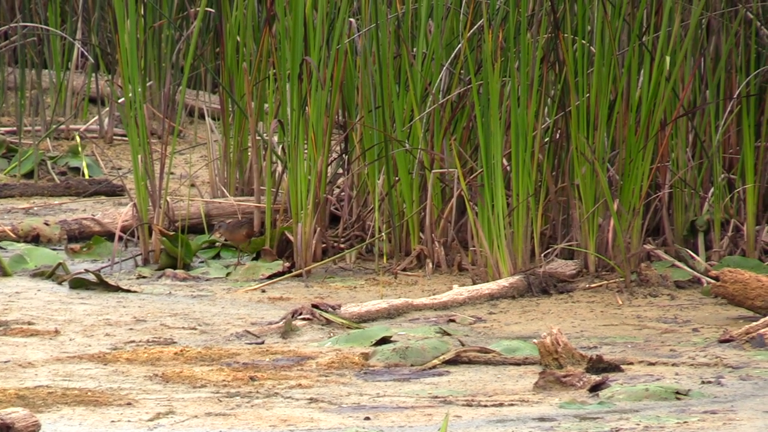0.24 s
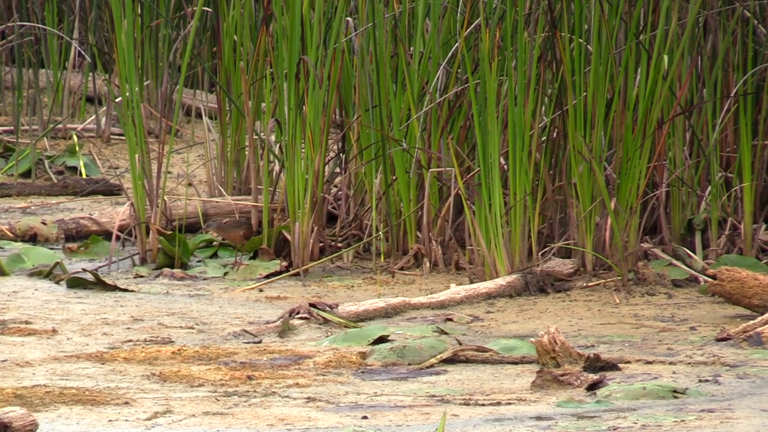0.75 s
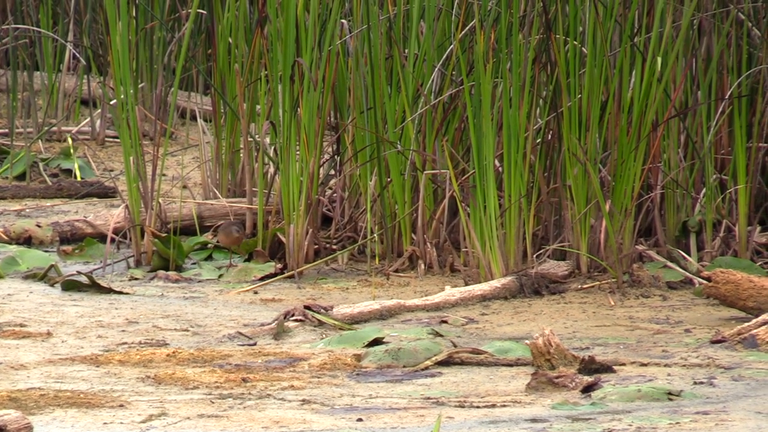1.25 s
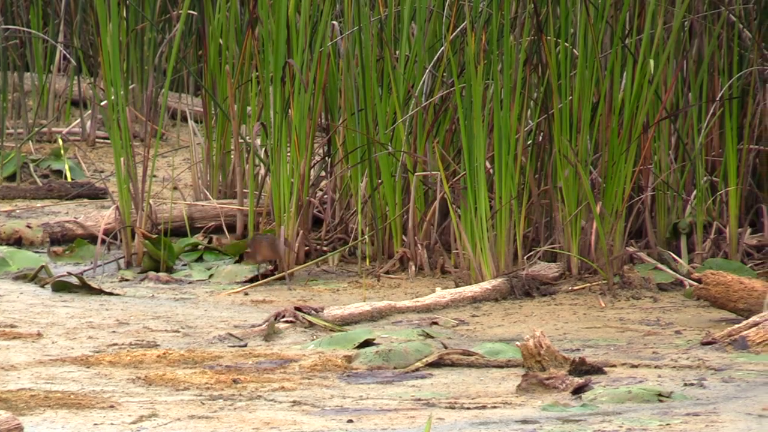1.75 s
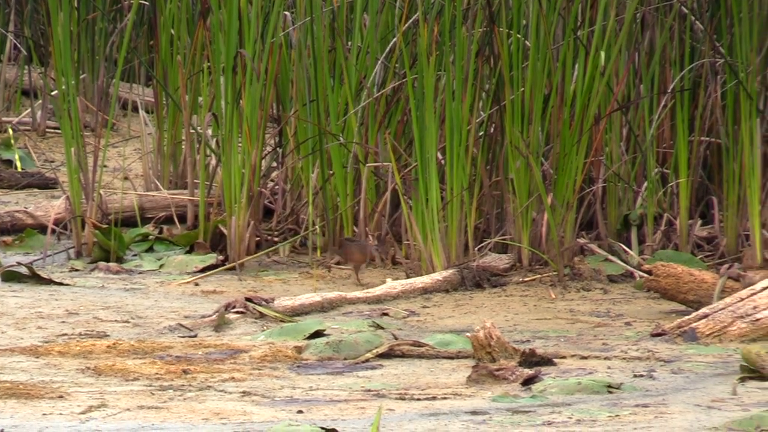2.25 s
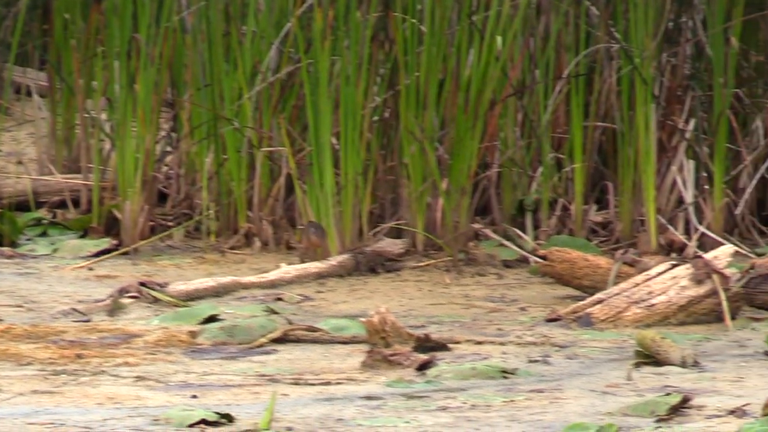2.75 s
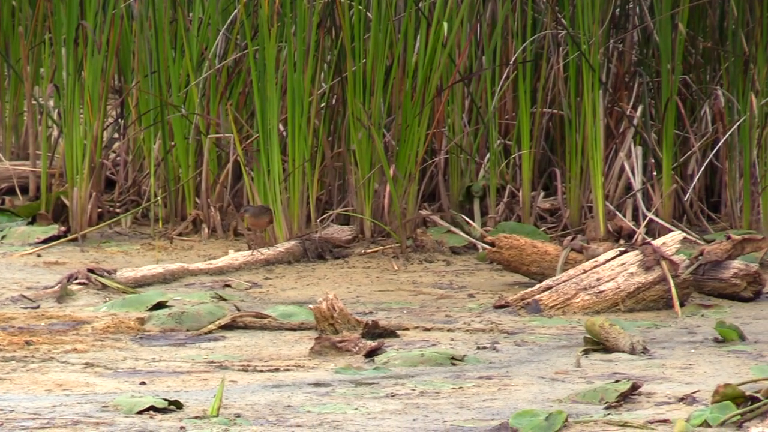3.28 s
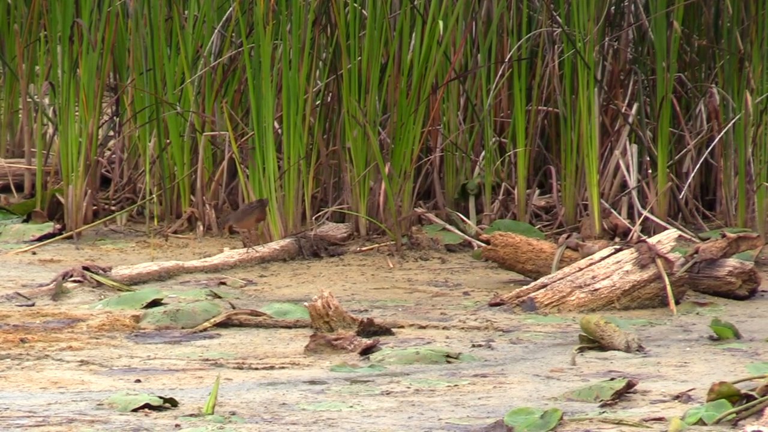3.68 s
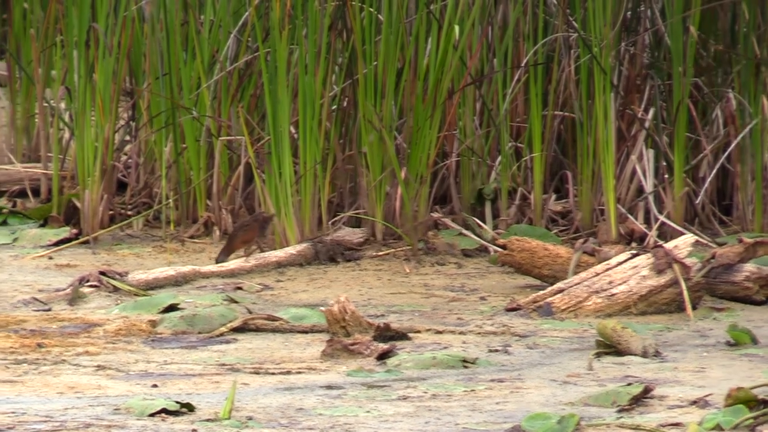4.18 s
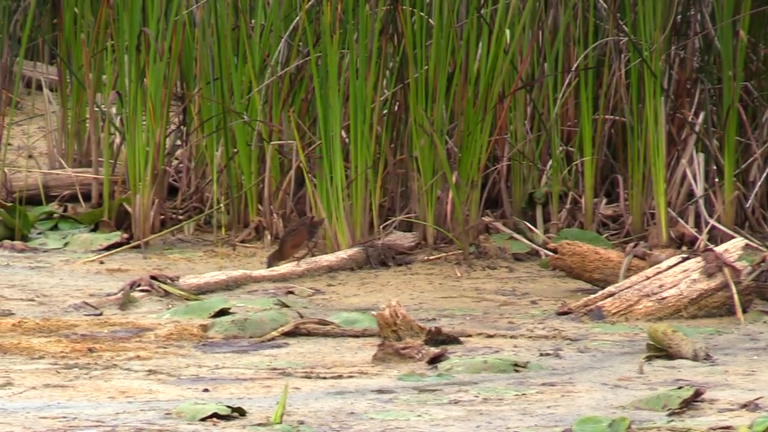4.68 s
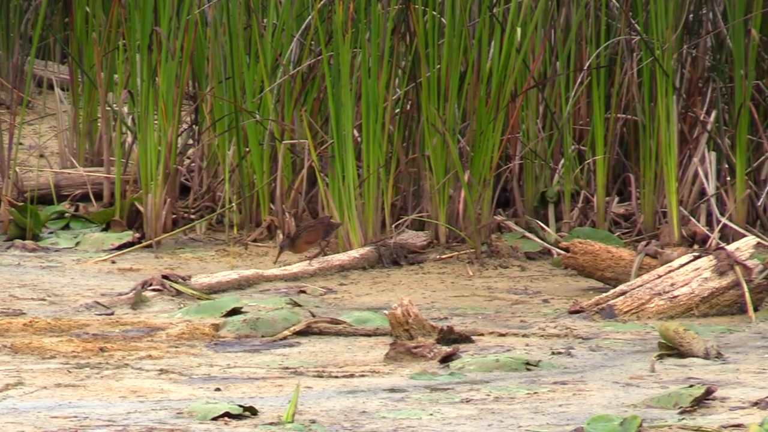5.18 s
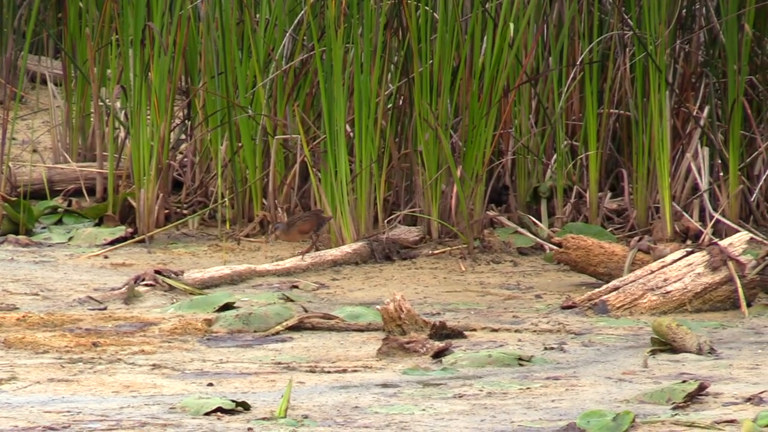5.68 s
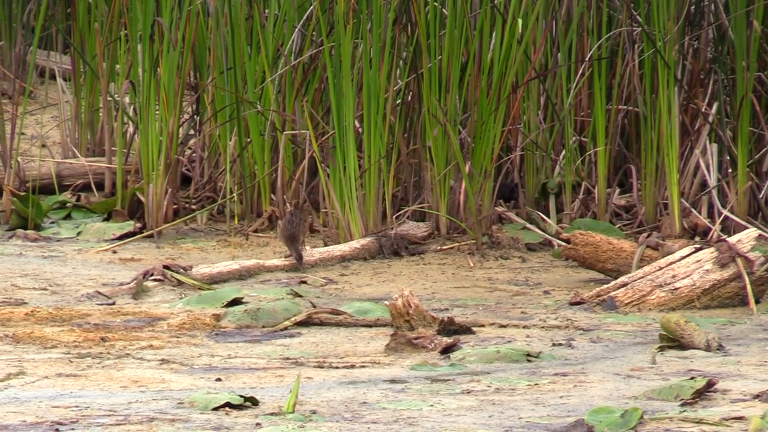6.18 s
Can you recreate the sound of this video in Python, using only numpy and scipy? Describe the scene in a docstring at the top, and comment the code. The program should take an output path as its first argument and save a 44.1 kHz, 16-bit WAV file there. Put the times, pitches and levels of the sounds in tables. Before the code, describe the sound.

A warm, quiet marsh heard outdoors, nearly mono. Throughout, close ground crickets make a bright tinkling near 8 kHz, each pulsing about fifteen times a second and overlapping into a shimmer; softer tree crickets hold a smooth fast trill near 5.5 kHz, with a blurred crowd of far insects behind. Another cricket gives a tiny, very high chirp of rapid strokes about every third of a second. Faint bird whistles slide between 1.0 and 1.6 s, with a blip near 1.9. From 2.4 s small distant birds twitter in quick darting notes and short buzzes, busiest around 2.6 and 3.9 to 4.5 s, ending about 4.9. Dry stem ticks fall at 0.1, in a little cluster at 1.0, then 1.5, 2.0, 2.4, 4.1, 5.0 and 5.7, the clearest at 6.05. Very low far traffic and faint hiss sit underneath; the insects continue to the end at 6.4 s.

```python
"""Warm day at the marsh

Ground crickets tinkle near 8 kHz close to the microphone, tree crickets trill near 5.5 kHz and one cricket
chirps at 9 kHz: all are tones shaped by wing strokes, over the coloured noise of far crowds.
Small birds farther off twitter in gliding whistles and shaken buzzes; stems tick in the mud as struck
resonances. Far traffic and microphone hiss are patchy noise. The sound is nearly mono."""
import sys
import numpy as np
from scipy import signal
from scipy.fft import rfft, irfft, next_fast_len
from scipy.io import wavfile
from scipy.ndimage import uniform_filter1d, map_coordinates

SR = 44100
rng = np.random.default_rng(int(sys.argv[2]) if len(sys.argv) > 2 else 0)


def store_wav(level_fs):
    """Save 16-bit WAV to argv[1]."""
    pcm = np.round(np.clip(np.atleast_2d(level_fs), -1, 1) * 32767)
    wavfile.write(sys.argv[1], SR, pcm.T.astype(np.int16))


N = 283563
T = np.arange(N) / SR  # seconds

# Far traffic through time. Each row: time in seconds, rumble level in dB, road drone level in dB.
TRAFFIC_LEVELS = [(0, -58, -51.5), (.6, -58, -52), (1.2, -55, -52.5), (1.8, -58, -53), (2.4, -64.5, -53),
                  (3.7, -59.5, -54), (4.5, -60, -55), (5.3, -65.5, -53.5), (5.8, -59, -53.5),
                  (6.43, -59.5, -55)]
# Colour of the far rumble. Each row: frequency in Hz, relative level in dB per Hz.
RUMBLE_COLOUR = [(12, -33), (22, -4), (33, -9), (55, -5.5), (75, 2), (129, -11), (170, -14.5), (220, -60)]
# Colour of the road drone. Each row: frequency in Hz, relative level in dB per Hz.
ROAD_COLOUR = [(76, -36), (130, -14), (193, 0), (257, -5.5), (381, -8.5), (607, -4.5), (861, -2.5),
               (4200, -30.5), (5460, -56)]
# Colour of the microphone hiss. Each row: frequency in Hz, relative level in dB per Hz.
HISS_COLOUR = [(1500, -20), (2600, -2.5), (4000, 0.5), (9500, -6.5), (10800, 2.5), (12000, -3), (15600, 1)]
# Level of a faint left-right difference noise. Each row: frequency in Hz, gain in dB.
DIFFERENCE_GAIN = [(60, -47), (380, -16.5), (1000, -38.5), (2400, -7.5), (4400, -32), (15000, -58)]
# Ticks of stems and mud. Each row: start in seconds, peak level in dB, brightness in dB per octave,
# length in seconds (the crackle falls 10 dB in it).
STEM_TICKS = [(.088, -36.5, -2, 0.03), (1.008, -40, -18, 0.011), (1.036, -37.5, -13, 0.018),
              (1.092, -37, -13, 0.021), (1.378, -46, -9, .02), (1.512, -34.5, -7, .018),
              (1.521, -40, 15, .012), (1.96, -37.5, -7, 0.045), (2.017, -37, -8, .012),
              (2.344, -37.5, -9, 0.027), (2.4, -40.5, 1, 0.02), (4.056, -35.5, -0.5, 0.029),
              (4.974, -42.5, -18, .015), (5.009, -43.5, -12, 0.018), (5.106, -42, -20, .02),
              (5.727, -35.5, -3, .012), (5.736, -42, 13, .01), (5.779, -40, -3, 0.017),
              (6.056, -31, -4.5, 0.023), (6.12, -38.5, -17, .03), (6.313, -44.5, -17, 0.02)]
# Resonances of a stem. Each row: frequency in Hz, width in Hz, level in dB.
STEM_MODES = [(1110, 270, 0), (1740, 290, -0.5), (2330, 440, 3), (3800, 1100, -1.5)]
# Whistled bird notes that glide to a turning pitch and away. Each row: start, turn and end in seconds,
# first, turning and last pitch in Hz, level at the highest pitch in dB.
BIRD_NOTES = [(.518, .535, .551, 2980, 2950, 2980, -68), (0.994, 1.01, 1.08, 3780, 4030, 4170, -59),
              (1.089, 1.118, 1.132, 4150, 4220, 4330, -54), (1.132, 1.145, 1.184, 4250, 4110, 4200, -63),
              (1.18, 1.2, 1.21, 4170, 4390, 3950, -53.5), (1.246, 1.255, 1.312, 4300, 4430, 4380, -50),
              (1.312, 1.34, 1.357, 4360, 4470, 4360, -53), (1.357, 1.384, 1.392, 4360, 4384, 4100, -49),
              (1.393, 1.428, 1.465, 2870, 2760, 2860, -61), (1.462, 1.476, 1.483, 4180, 4120, 4500, -56),
              (1.483, 1.492, 1.506, 4500, 4570, 4500, -52), (1.475, 1.52, 1.555, 6030, 6400, 6400, -56),
              (1.53, 1.55, 1.565, 4600, 4400, 4150, -56), (1.57, 1.573, 1.579, 4000, 3950, 3850, -55),
              (1.879, 1.888, 1.894, 4800, 4100, 4450, -54), (2.437, 2.445, 2.455, 3580, 2880, 3310, -54),
              (2.456, 2.465, 2.477, 3310, 3660, 2980, -51), (2.498, 2.506, 2.524, 5240, 4950, 3650, -42.5),
              (2.523, 2.536, 2.546, 3650, 3350, 3540, -52), (2.546, 2.553, 2.558, 3500, 3050, 4250, -49),
              (2.57, 2.581, 2.593, 4150, 4300, 3500, -50), (2.593, 2.6, 2.607, 3500, 3150, 2850, -50),
              (2.597, 2.605, 2.617, 4260, 3760, 3400, -48), (2.62, 2.629, 2.655, 3850, 4380, 4150, -52),
              (2.66, 2.67, 2.676, 3860, 3100, 2950, -47), (2.679, 2.684, 2.69, 3050, 3050, 3200, -47),
              (2.672, 2.684, 2.697, 3950, 4170, 4400, -42.5), (2.69, 2.697, 2.712, 3200, 3620, 2890, -47),
              (2.698, 2.705, 2.712, 4420, 4280, 3900, -42), (2.712, 2.717, 2.723, 3300, 4290, 3390, -47),
              (2.723, 2.727, 2.733, 3400, 4220, 3600, -44), (2.733, 2.738, 2.746, 3600, 4050, 3350, -46),
              (2.746, 2.756, 2.761, 3370, 3020, 2150, -56), (2.95, 2.954, 2.957, 3050, 3050, 3060, -57),
              (2.957, 2.958, 2.961, 4050, 4100, 4150, -50), (2.962, 2.966, 2.97, 3400, 4300, 3050, -47),
              (2.977, 2.984, 2.989, 5300, 3590, 4300, -42), (2.989, 2.995, 3.007, 4700, 4800, 5040, -39.5),
              (3.161, 3.165, 3.17, 6330, 5200, 4320, -41), (3.162, 3.174, 3.182, 3450, 3180, 3350, -55.5),
              (3.182, 3.187, 3.198, 3350, 3700, 3250, -57), (3.2, 3.212, 3.214, 5000, 3250, 3100, -43.5),
              (3.259, 3.259, 3.27, 3000, 3250, 4800, -46), (3.27, 3.282, 3.284, 4900, 3250, 3100, -47),
              (3.283, 3.302, 3.313, 3070, 3200, 3150, -52), (3.419, 3.424, 3.428, 4150, 4150, 4400, -52),
              (3.445, 3.449, 3.45, 4460, 4250, 4100, -50), (3.565, 3.574, 3.583, 5000, 4820, 4050, -43.5),
              (3.598, 3.605, 3.62, 4000, 4850, 4550, -46), (3.623, 3.637, 3.65, 4600, 3650, 5000, -47.5),
              (3.657, 3.669, 3.688, 5040, 3420, 3390, -48.5), (3.719, 3.734, 3.756, 4900, 3420, 4150, -47),
              (3.703, 3.735, 3.742, 3900, 2930, 3050, -57), (3.742, 3.76, 3.771, 3030, 3250, 2150, -51),
              (3.765, 3.769, 3.773, 4700, 4200, 3100, -50), (3.861, 3.865, 3.869, 3950, 3650, 3130, -43),
              (3.869, 3.87, 3.882, 3150, 3230, 5200, -44), (3.886, 3.891, 3.896, 4200, 4100, 3000, -40.5),
              (3.847, 3.852, 3.858, 2650, 2680, 2780, -62), (3.903, 3.911, 3.921, 5300, 2950, 3150, -45),
              (3.977, 3.994, 4.0, 2690, 2760, 2850, -59), (3.988, 3.994, 4.001, 4440, 3060, 3060, -43),
              (4.001, 4.002, 4.011, 3060, 3040, 4700, -42), (4.022, 4.042, 4.062, 4150, 4120, 4000, -54),
              (4.072, 4.11, 4.145, 2710, 2610, 2760, -63), (4.11, 4.117, 4.124, 5000, 3500, 3050, -47),
              (4.122, 4.129, 4.134, 4500, 3450, 2700, -48), (4.174, 4.198, 4.232, 4550, 4360, 4435, -41),
              (4.235, 4.268, 4.28, 5450, 5150, 5400, -44), (4.279, 4.289, 4.335, 5400, 5440, 5250, -42),
              (4.336, 4.359, 4.395, 5250, 5300, 5580, -45.5), (4.239, 4.28, 4.318, 2660, 2730, 2670, -59.5),
              (4.24, 4.252, 4.259, 4300, 3450, 3700, -53), (4.259, 4.272, 4.285, 3700, 3070, 4400, -48),
              (4.285, 4.297, 4.305, 4320, 3700, 4700, -45), (4.32, 4.335, 4.344, 4920, 4040, 3450, -40),
              (4.367, 4.372, 4.376, 4460, 3500, 2760, -48), (4.368, 4.38, 4.395, 2730, 2760, 2820, -60),
              (4.387, 4.397, 4.43, 6100, 4150, 4450, -44), (4.404, 4.412, 4.416, 4600, 5100, 5900, -45),
              (4.471, 4.48, 4.484, 5280, 4150, 3300, -39), (4.493, 4.501, 4.514, 4300, 3470, 3400, -45),
              (4.513, 4.528, 4.537, 3410, 3700, 2600, -51), (4.676, 4.682, 4.696, 3900, 4150, 3600, -50),
              (4.696, 4.702, 4.711, 3600, 5000, 3600, -44), (4.71, 4.719, 4.725, 3600, 3600, 4300, -51),
              (4.884, 4.886, 4.911, 6350, 6230, 5300, -46)]
# Buzzy bird notes. Each row: start in seconds, length in seconds, first pitch in Hz, last pitch in Hz,
# pitch swing in Hz, level in dB.
BIRD_BUZZES = [(2.653, 0.024, 4270, 3730, 603, -45), (2.71, .04, 4000, 3700, 601, -48.5),
               (3.215, 0.035, 3340, 3350, 280, -49.5), (3.299, 0.13, 4010, 4690, 557, -48),
               (3.298, 0.073, 3190, 3500, 350, -56.5), (3.913, .024, 4200, 4150, 300, -52),
               (4.484, .018, 4800, 4000, 405, -45), (4.724, .033, 4100, 4190, 300, -55)]
# Chirps of the high cricket. Each entry: middle of the first full stroke in seconds.
CHIRP_TIMES = [.108, .441, .772, 1.12, 1.426, 1.877, 2.202, 2.587, 2.968, 3.355, 3.713, 4.089, 4.437, 4.777,
               5.129, 5.441, 5.787, 6.13, 6.417]
# Tree crickets that stand out of the trill. Each row: beat at the start in strokes, pace in strokes a
# second, change of pace in strokes a second per second, pitch in Hz, fall in Hz, stroke length in
# seconds, level in dB.
TREE_SINGERS = [(-.1, 75.74, .14, 5750, 500, 0.0097, -54.5), (-0.306, 70.02, -.06, 5500, 500, .01, -56),
                (.32, 81.37, -.02, 5750, 500, .008, -55.5), (-.22, 72.5, -.08, 5300, 490, .009, -56)]
# Colour of the far tree crickets. Each row: frequency in Hz, relative level in dB per Hz.
FAR_TREE_COLOUR = [(2470, -54), (4400, -19.5), (4840, -4.5), (5600, 4.5), (5930, -1.5), (6190, -14),
                   (6500, -22), (8450, -49)]
# Ground crickets near the microphone. Each row: beat at the start in strokes, pace at the start in
# strokes a second, change of pace in strokes a second per second, pitch in Hz, fall in Hz, stroke
# length in seconds, level in dB.
NEAR_SINGERS = [(-.165, 15.898, .0196, 7720, 900, .026, -43), (.03, 15.86, -.0112, 8360, 450, .022, -43),
                (-.38, 14.54, 0, 8240, 350, .02, -48), (-0.079, 14.331, -.0032, 8400, 380, .017, -50),
                (0.492, 15.862, -.012, 8720, 200, .015, -60), (.42, 14.92, 0, 8150, 350, .02, -50.5)]
# Colour of the blurred far ground crickets. Each row: frequency in Hz, relative level in dB per Hz.
FAR_GROUND_COLOUR = [(6000, -51), (6450, -19), (6900, -9.5), (7300, -2), (7650, 1.5), (8300, -5),
                     (8750, -7), (9000, -22), (9350, -48)]

TOP_HZ = 15750  # band limit of the recorder
JOIN = 66  # samples of fade on each side of a bird note's edge
WAVER_HZ = 22  # unsteadiness of a held bird pitch
SOFTER_DB_PER_KHZ, ROUND = 6, 1.393  # a note softens as its pitch drops; how round it bends into the turn


def amp(db):
    """Amplitude factor of a level in dB."""
    return 10 ** (np.asarray(db) / 20)


def unit(x):
    """x scaled to rms 1."""
    return x / np.sqrt(np.mean(x ** 2) + 1e-20)


def along(points, hz):
    """(Hz, value) points read on a log frequency axis."""
    f, value = np.transpose(points)
    return np.interp(np.log(hz + 1), np.log(f + 1), value)


def wobble(rate):
    """A smooth random curve, rate knots a second."""
    knots = rng.standard_normal(int(N * rate / SR) + 4)
    return map_coordinates(knots, [T * rate])


def filtered(x, response):
    """x times a complex response of frequency."""
    m = next_fast_len(N + SR // 2)
    return irfft(rfft(x, m) * response(np.fft.rfftfreq(m, 1 / SR)), m)[..., :N]


def rush(spectrum, patchy_db):
    """Coloured noise of rms 1 with patches of random gain in time and frequency."""
    z = signal.stft(rng.standard_normal(N), nperseg=256)[2]
    field = uniform_filter1d(rng.standard_normal(z.shape), 3, 0)
    field = uniform_filter1d(field, 8, 1)
    noise = signal.istft(z * amp(patchy_db * unit(field)), nperseg=256)[1][:N]
    return unit(filtered(noise, lambda hz: amp(along(spectrum, hz))))


def reeds(x, wet_db, t60):
    """Sound scattered by the stems follows the direct sound as a decaying noise tail."""
    t = np.arange(SR // 4) / SR
    tail = rng.standard_normal(len(t)) * amp(-60 * t / t60)
    return x + amp(wet_db) * signal.fftconvolve(x, tail / np.linalg.norm(tail))[:N]


def strokes(beat, rate, hz, fall_hz, length, scatter_db, lower_db=-7):
    """One tone per wing stroke on whole beats: pitch arches up, then slides and fades as the scraper slows."""
    from_centre = (beat + .5) % 1 - .5
    u = np.clip(from_centre / (rate * length) + .45, 0, 1)  # progress through the stroke
    number = np.round(beat - np.floor(beat.min())).astype(int)
    size, detune = rng.standard_normal((number.max() + 1, 2)).T
    rise = np.clip(1 - u / .3, 0, 1)
    slide = np.clip((u - .48) / .52, 0, 1)
    pitch = hz + 30 * detune[number] - 250 * rise ** 2 - fall_hz * slide ** 1.4
    shape = np.clip(np.minimum(u / 0.39, (1 - u) / 0.067), 0, 1) * amp(-13 * fall_hz / 1000 * slide)
    phase = 2 * np.pi * np.cumsum(pitch) / SR
    # the other wing rings a little lower
    wings = np.sin(phase) + amp(lower_db) * np.sin(0.966 * phase + 3 * detune[number])
    level = amp(scatter_db * size[number] + 1.87 * wobble(250))
    return unit(level * shape * wings)


def background():
    """Far traffic rumbles and drones over the hiss of the microphone."""
    s, rumble_db, road_db = np.transpose(TRAFFIC_LEVELS)
    rumble_level = amp(np.interp(T, s, rumble_db) + 1.7 * wobble(3.44))
    rumble = rumble_level * rush(RUMBLE_COLOUR, patchy_db=.5)
    road = amp(np.interp(T, s, road_db)) * rush(ROAD_COLOUR, patchy_db=1.0)
    return rumble + road + amp(-56.5) * rush(HISS_COLOUR, patchy_db=2.0)


def ticks():
    """A snap and a lumpy crackle ring the stem; brighter ticks weight the upper modes."""
    out = np.zeros(N + SR)
    t = np.arange(SR // 8) / SR
    f = np.fft.rfftfreq(len(t), 1 / SR)
    for s, db, bright_db, length in STEM_TICKS:
        lumps = amp(3.4 * np.repeat(rng.standard_normal(64), len(t) // 64 + 1)[:len(t)])
        snap = amp(-8 - 26 * t / 0.0063)
        crackle = lumps * amp(-15 - 10 * t / length)
        force = rng.standard_normal(len(t)) * (snap + crackle) + 1.55 * (t == 0)
        body = 0
        for k, (centre, width, level) in enumerate(STEM_MODES):
            mode_db = level + rng.normal(0, 1.4) + bright_db * max(0, np.log2(centre / 1650))
            resonance = 1j * f * width / (centre * centre - f * f + 1j * f * width)
            body = body + (-1) ** k * amp(mode_db) * resonance
        soft = (1 + 1j * f / (4600 * 2 ** (bright_db / 14))) ** -2  # a dull blow lasts longer
        tick = irfft(rfft(force) * soft * body, len(t))
        out[round(s * SR):][:len(t)] += amp(db) * tick / np.abs(tick).max()
    return out[:N]


def whistles():
    """Tones with a weak octave bend through one turn and waver; one begun where another ends continues it."""
    out, waver = np.zeros(N), WAVER_HZ * wobble(80)
    carried = {}  # phase left by a note, by its end time to a hundredth of a second
    for start, turn, end, first_hz, turn_hz, last_hz, db in BIRD_NOTES:
        cut = slice(round(start * SR) - JOIN, round(end * SR) + JOIN)
        t = T[cut]
        edge = np.clip(np.minimum(t - t[0], t[-1] - t) * SR / (2 * JOIN), 0, 1)
        away = np.interp(t, [start, turn, end], [1, 0, 1]) ** ROUND
        outer_hz = np.where(t < turn, first_hz, last_hz)
        hz = uniform_filter1d(turn_hz + (outer_hz - turn_hz) * away, size=60)
        phase = 2 * np.pi * np.cumsum(hz + waver[cut]) / SR
        phase += carried.get(round(start, 2), 0) - phase[JOIN]
        carried[round(end, 2)] = phase[-JOIN]
        drop_khz = (hz.max() - hz) / 1000
        tone = np.sin(phase) + amp(-23) * np.sin(2 * phase)
        out[cut] += np.sqrt(2) * amp(db - SOFTER_DB_PER_KHZ * drop_khz) * edge * tone
    return out


def buzzes():
    """Tones shaken in pitch around 185 times a second, louder on the upstroke."""
    out = np.zeros(N)
    for s, length, first_hz, last_hz, swing_hz, db in BIRD_BUZZES:
        u = np.clip((T - s) / length, 0, 1)
        cycle = 2 * np.pi * np.cumsum(185 + 30 * wobble(60)) / SR
        shake = np.sin(cycle) + .7 * wobble(500)
        upstroke = .72 + .28 * np.cos(cycle)
        pitch = first_hz + (last_hz - first_hz) * u + swing_hz * shake
        tone = np.sin(2 * np.pi * np.cumsum(pitch) / SR)
        out += np.sqrt(2) * amp(db) * np.sin(np.pi * u) ** 0.3 * upstroke * tone
    return out


def birds():
    """Whistles and buzzes flutter in level and scatter among the stems."""
    flutter = amp(2.1 * wobble(260))
    return reeds((whistles() + buzzes()) * flutter, wet_db=-8.0, t60=0.17)


def high_cricket():
    """A weak first stroke, then six full ones; the wing starts afresh at each stroke."""
    out = np.zeros(N)
    for s in CHIRP_TIMES:
        beat = (T - s) / 0.0088  # seconds from stroke to stroke
        u = (beat + .5) % 1
        number = np.clip(np.round(beat + 1).astype(int), 0, 6)
        size = amp(rng.normal(0, 1.2, 7) - [9, 2, 0, 0, 0, 0, 1.5])
        start = 2 * np.pi * rng.random() + rng.normal(0, 1.6, 7)
        on = (beat > -1.5) & (beat < 5.5)
        phase = start[number] + 2 * np.pi * np.cumsum(9210 - 250 * u) / SR
        out += on * amp(-38.5) * size[number] * np.sin(np.pi * u) ** 0.93 * np.sin(phase)
    return reeds(out, wet_db=-12, t60=0.058)


def tree_crickets():
    """Fast trills of wing strokes that swell slowly, over the hiss of many far ones."""
    trill = 0
    for start, rate, change, hz, fall, length, db in TREE_SINGERS:
        swell = amp(db + 1.2 * wobble(1.49))
        beat = start + (rate + change * T / 2) * T + .12 * wobble(1.5)
        trill = trill + swell * strokes(beat, rate, hz, fall, length, scatter_db=1.5)
    far = amp(-47.0 + 0.5 * wobble(2.9)) * rush(FAR_TREE_COLOUR, patchy_db=1.16)
    return reeds(trill, wet_db=-7.5, t60=0.18) + far


def ground_crickets():
    """Near singers keep their own wing-stroke pace; others at middle distance and a far crowd fill the gaps."""
    near = 0
    for start, rate, change, hz, fall, length, db in NEAR_SINGERS:
        beat = start + (rate + change * T / 2) * T
        near = near + amp(db) * strokes(beat, rate, hz, fall, length, scatter_db=1.5)
    middle = 0
    for k, (pace, place, start) in enumerate(rng.random((8, 3))):
        *_, hz, fall, length, _ = NEAR_SINGERS[k % 2]  # the first two near singers lend their stroke
        rate = 12.5 + 5 * pace
        beat = rate * T + start + .2 * wobble(1.2)
        middle = middle + strokes(beat, rate, hz + 300 * (place - .5), fall, length, scatter_db=0.5)
    crowd = amp(-42.5) * rush(FAR_GROUND_COLOUR, patchy_db=2.5)
    return reeds(near + amp(-47) * unit(middle), wet_db=-8.5, t60=0.14) + crowd


def scene():
    """All sources sit in the middle; a faint separate noise is added left and subtracted right."""
    mid = background() + ticks() + birds() + high_cricket() + tree_crickets() + ground_crickets()
    difference = filtered(background(), lambda hz: amp(along(DIFFERENCE_GAIN, hz)))
    return np.array([mid + difference, mid - difference])


def record(dry):
    """The recorder keeps nothing above its band limit."""
    return filtered(dry, lambda hz: hz < TOP_HZ)


dry = scene()
out = record(dry)
store_wav(out)
```